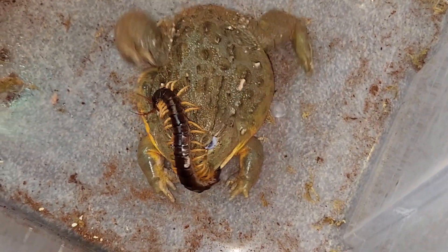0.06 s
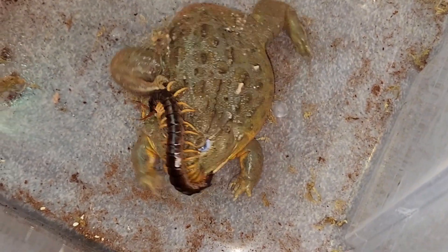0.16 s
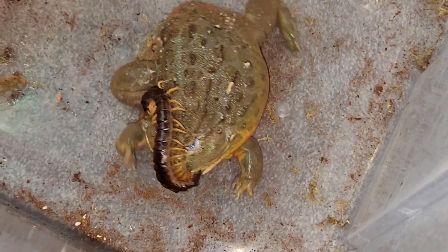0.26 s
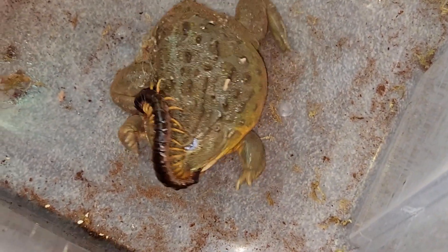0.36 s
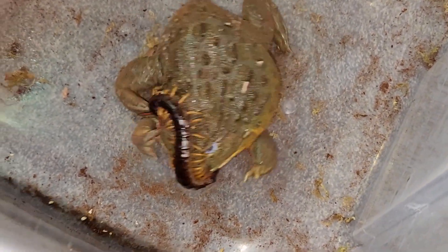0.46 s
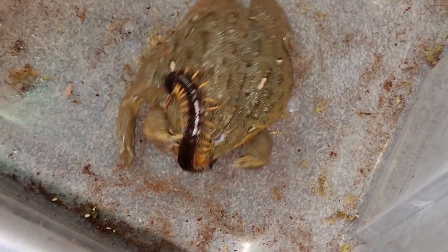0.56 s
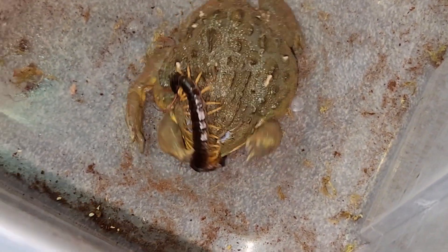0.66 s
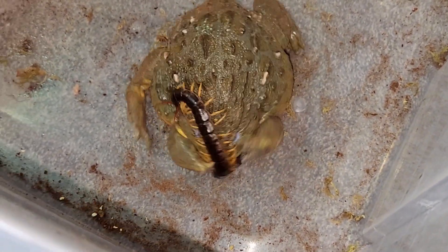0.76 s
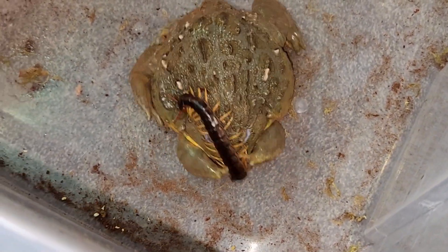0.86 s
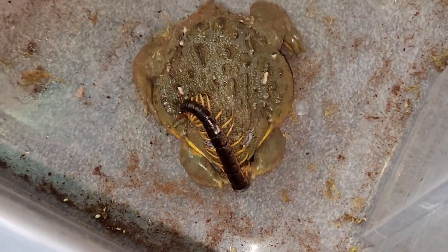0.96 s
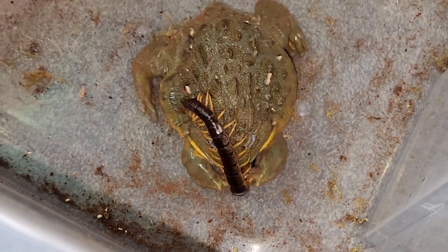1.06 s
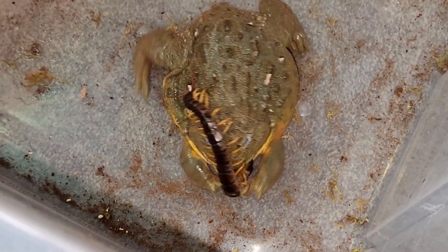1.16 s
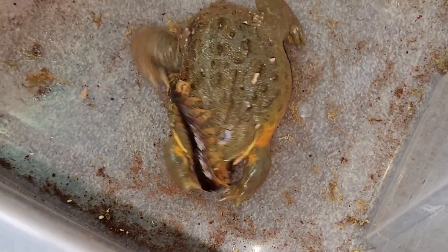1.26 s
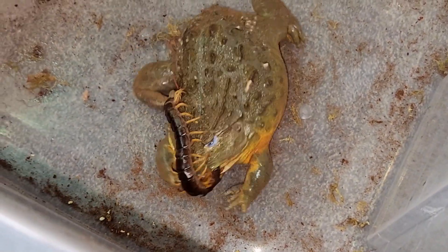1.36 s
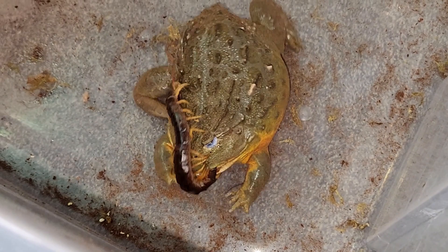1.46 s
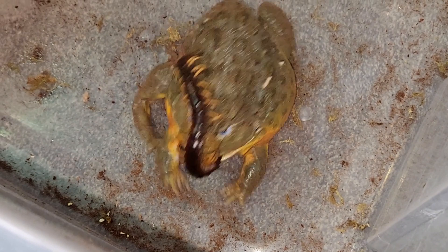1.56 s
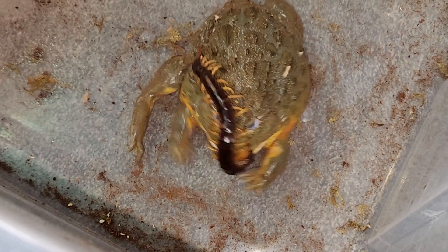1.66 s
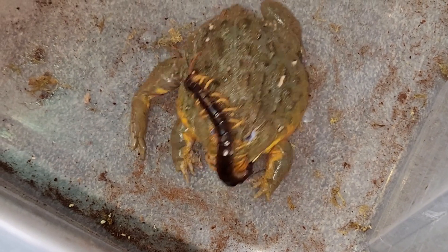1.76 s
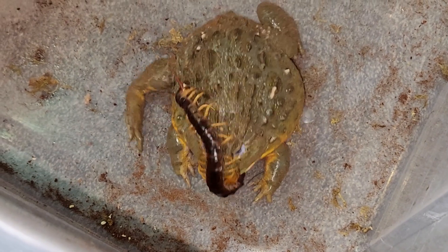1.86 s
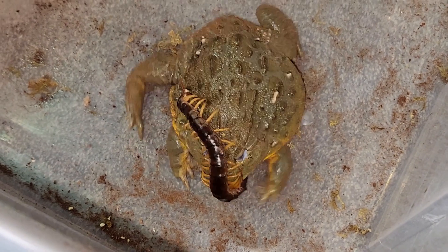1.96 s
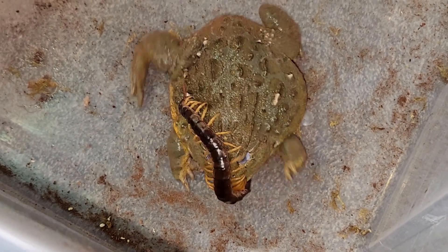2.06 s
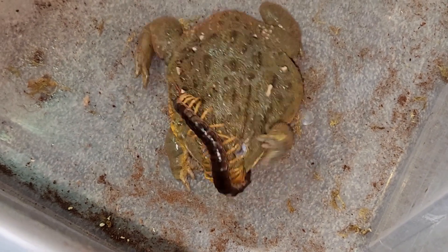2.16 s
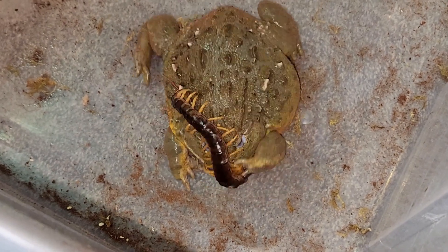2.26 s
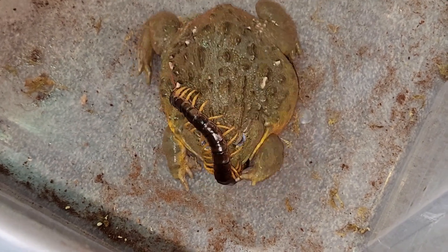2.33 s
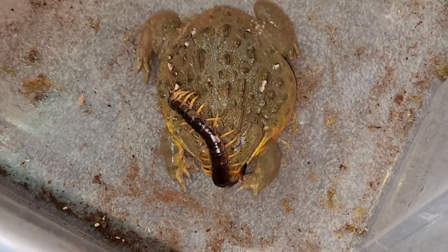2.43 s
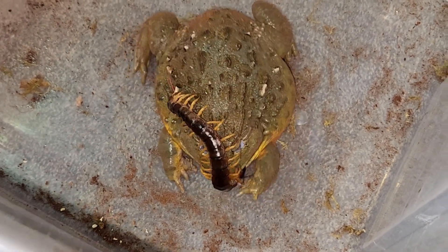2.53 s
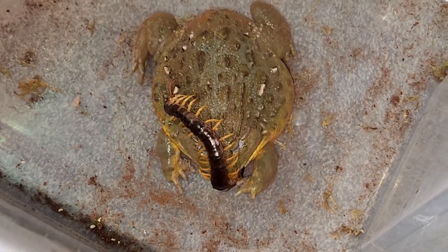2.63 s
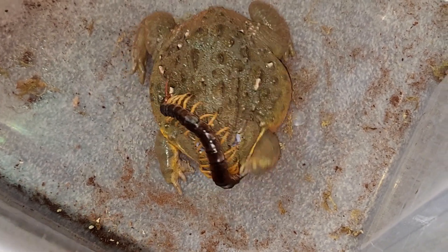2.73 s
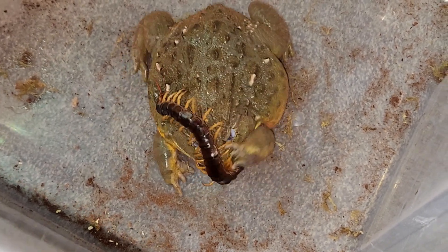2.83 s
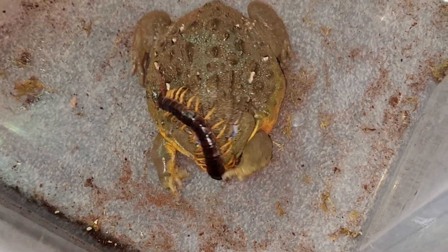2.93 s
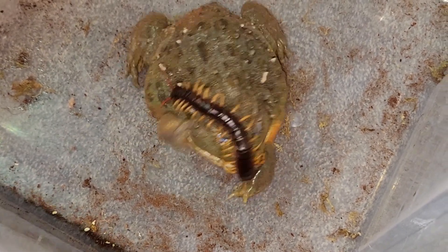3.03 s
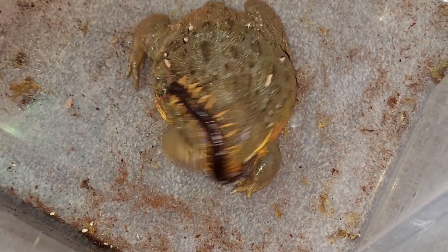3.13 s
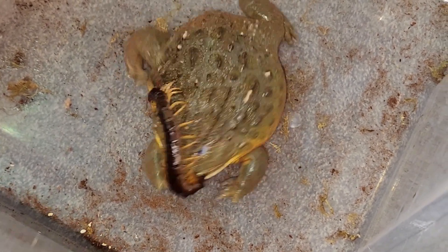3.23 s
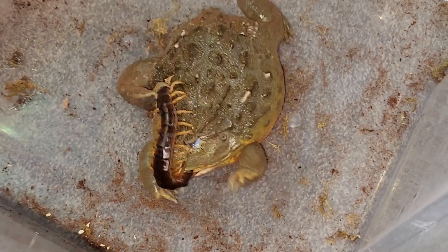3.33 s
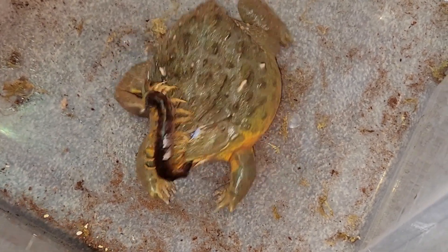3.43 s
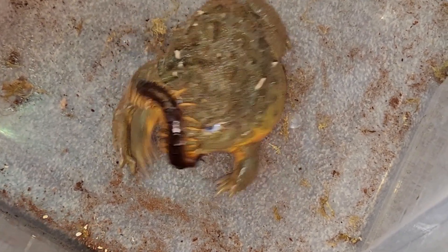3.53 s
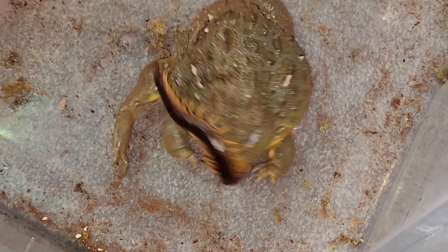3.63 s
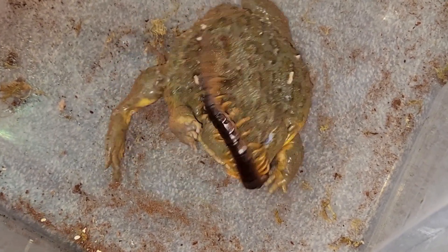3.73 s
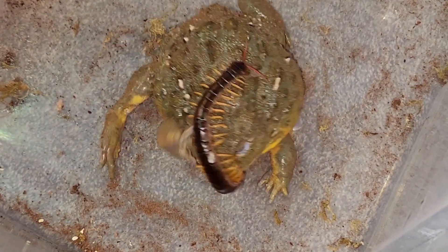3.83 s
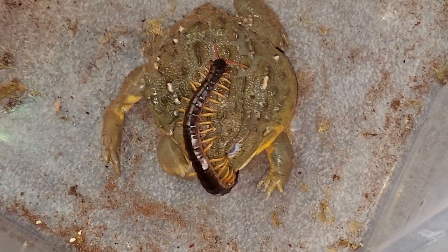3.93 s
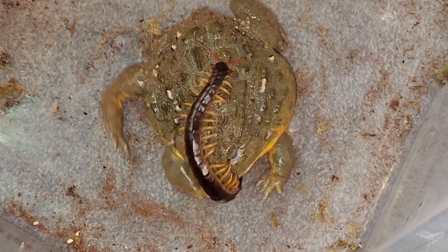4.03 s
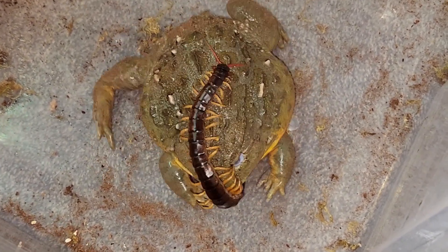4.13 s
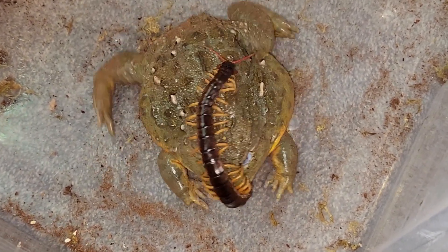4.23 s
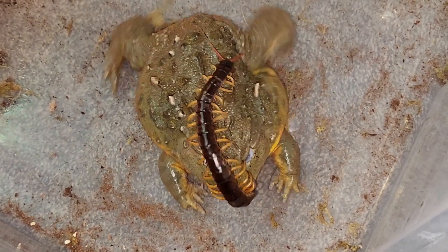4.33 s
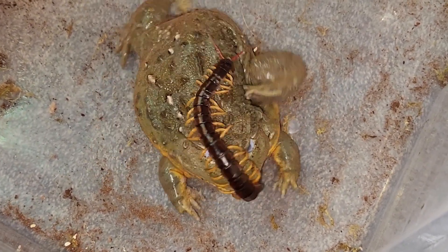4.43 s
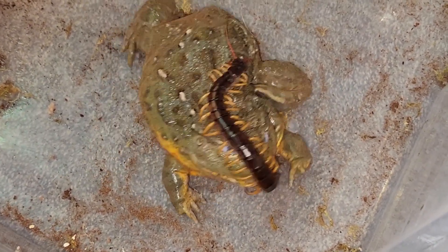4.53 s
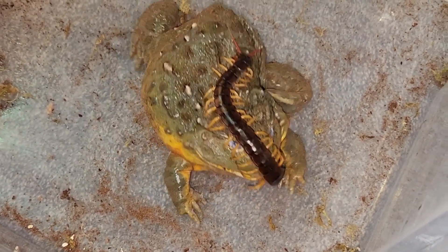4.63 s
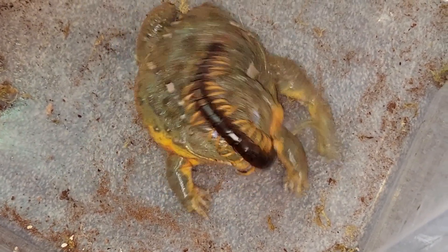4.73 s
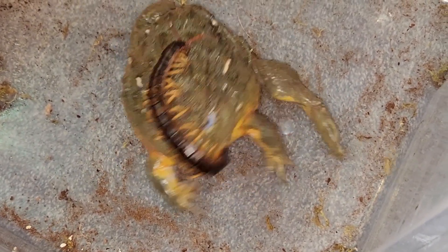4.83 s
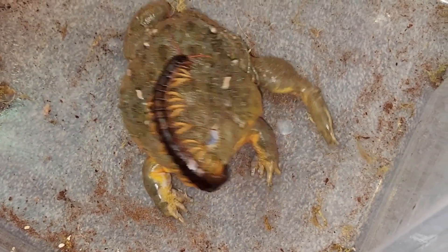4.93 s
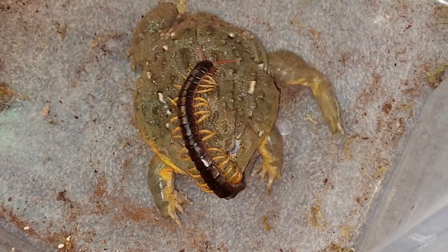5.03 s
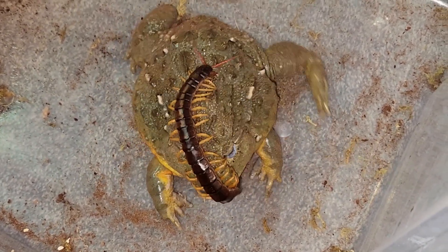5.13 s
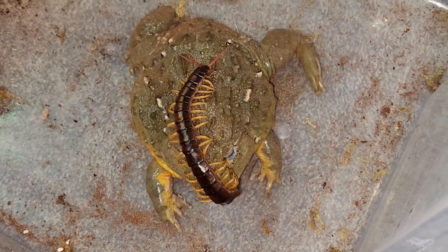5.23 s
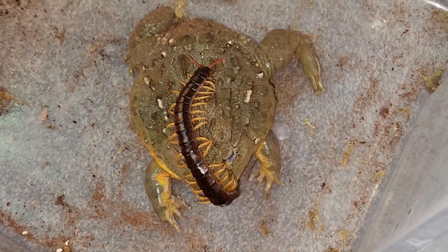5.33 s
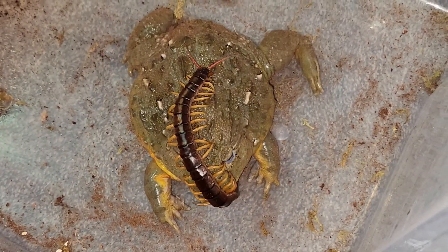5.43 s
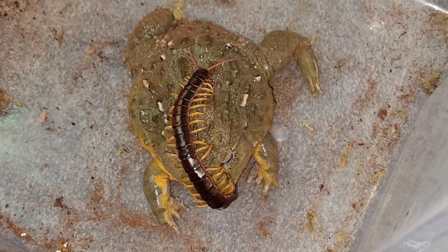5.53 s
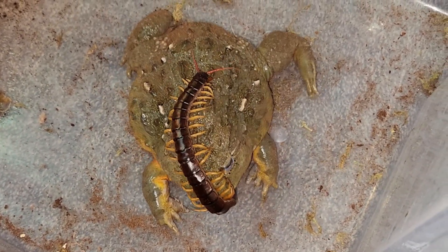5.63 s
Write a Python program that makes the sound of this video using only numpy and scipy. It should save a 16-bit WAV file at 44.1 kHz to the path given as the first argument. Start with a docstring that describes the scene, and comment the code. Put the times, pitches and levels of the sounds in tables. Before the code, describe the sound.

Close, uneven knocks and sandy skin scraping on a plastic tub floor as a frog struggles with prey, over a faint low hum.

```python
"""A plastic tub in a small room, heard up close: a big frog thrashes while it swallows a centipede.
Body blows ring the modes of the tub floor. Jaws, shell, slapping skin and grit give short noise bursts.
Skin scuffs over plastic and sand by stick-slip friction, coloured by the tub's air and walls.
A faint machine hum, a low rumble and room hiss lie underneath."""
import sys
import numpy as np
from scipy import signal
from scipy.fft import rfft, irfft, next_fast_len
from scipy.io import wavfile
from scipy.ndimage import uniform_filter1d

SR = 44100
rng = np.random.default_rng(int(sys.argv[2]) if len(sys.argv) > 2 else 0)


def output_pcm(signal):
    """Save a mono or channel-first signal as 16-bit PCM at the path in sys.argv[1].

    Samples are clipped to [-1, 1] before scaling.
    """
    pcm = np.clip(np.atleast_2d(signal).T, -1, 1) * 32767
    wavfile.write(sys.argv[1], SR, np.round(pcm).astype(np.int16))


N = 250929
TIME_S = np.arange(N) / SR

# likeness of the two channels: freq_hz, correlation
STEREO_LIKENESS = [(60, 0.8), (300, 0.88), (700, 0.6), (1400, 0.21), (3000, 0), (5000, 0.19), (8000, 0.3),
                   (14000, 0.96)]
# balance of noise textures, left over right: freq_hz, lean_db
STEREO_LEAN = [(60, -5.5), (200, 1.5), (700, 4.5), (1300, -1), (2400, 4.5), (4400, 1.5), (8100, 10),
               (12000, 6), (15000, 0)]
# room decay: freq_hz, t60_s
ROOM_DECAY = [(100, 0.75), (500, 0.19), (2000, 0.24), (6000, 0.057), (15000, 0.2)]
# room hiss spectrum: freq_hz, density_db
HISS_SPECTRUM = [(25, -3.5), (100, 1.5), (170, -10.5), (300, -18), (430, -15), (560, -24.5), (860, -16),
                 (1200, -21), (3000, -28), (6000, -33.5), (7600, -31), (10000, -51), (12500, -27),
                 (16000, -43)]
# rumble spectrum: freq_hz, density_db
RUMBLE_SPECTRUM = [(10, -20), (28, -5), (52, 0.5), (85, -5.0), (130, -19), (300, -34.5), (900, -88.5)]
# rumble surges: start_s, end_s, level_db
RUMBLE_SURGES = [(-.05, 0.752, -56), (0.273, 0.362, -44), (1.812, 2.018, -43.5), (2.038, 2.29, -46),
                 (2.35, 2.477, -50), (3.298, 3.9, -56), (4.699, 5.453, -52)]
# machine hum swells: start_s, end_s, lower_line_db, upper_line_db
HUM_SWELLS = [(0.401, 1.45, -53.5, -69), (3.5, 4.083, -54.5, -65), (4.094, 5.9, -49.5, -51.5),
              (5.15, 5.9, -48, -59)]
# air resonances in the tub: freq_hz, width_hz, gain_db
CAVITY_MODES = [(576, 30, 2.5), (747, 41, 9), (880, 110, 8.5), (1387, 190, 4), (2024, 70, 2),
                (2290, 80, 2.5), (3064, 110, 6), (3496, 88, 6)]
# sand dragged over plastic: freq_hz, density_db
GRIT_SPECTRUM = [(4000, -10), (6200, -9), (7800, 4), (9600, -6.5), (12500, 3.5), (15500, -2)]
# skin scuffing plastic: freq_hz, density_db
SCUFF_SPECTRUM = [(90, -10.5), (160, 2), (235, 6.5), (315, -2.5), (450, -0.5), (620, -6), (900, -8),
                  (1700, -5.5), (3000, -9), (4200, -12), (6000, -13), (9000, -24.5)]
# bouts of fidgeting: start_s, end_s, scuff_db
BOUTS = [(-.1, 1.094, -57), (1.04, 2.533, -64), (2.89, 4.234, -62.5), (4.199, 5.284, -59)]
# skin slides: start_s, end_s, rise_share, scuff_db, grit_db, rasp_db, rasp_hz
SLIDES = [(-.06, .12, 0.52, -49.5, -56, -50, 1000), (0.069, .245, 0.27, -51, -57.5, -48, 1770),
          (.22, 0.427, 0.75, -51, -54.5, -51, 1830), (0.462, 0.699, 0.087, -54, -58.5, -53.5, 1530),
          (0.659, 0.841, .3, -63, -61, -71.5, 1490), (0.809, .985, .5, -49, -50, -51, 990),
          (1.041, 1.197, 0.48, -58, -63, -59, 1360), (1.199, 1.438, 0.27, -50, -57.5, -60, 980),
          (1.477, 1.632, 0.49, -45.5, -49.5, -55, 850), (1.585, 1.735, 0.4, -48, -54, -50, 1440),
          (1.79, 2.152, 0.43, -56.5, -59, -59.5, 1200), (2.016, 2.18, 0.36, -68, -65, -56.5, 800),
          (2.343, 2.462, 0.41, -66, -66.5, -78, 710), (2.93, 3.111, 0.55, -62.5, -63, -78, 1000),
          (3.166, 3.362, 0.52, -48.5, -55, -61, 1600), (3.448, 3.6, 0.56, -45, -53.5, -58, 1800),
          (3.567, 3.818, 0.26, -54, -56.5, -61, 2190), (3.979, 4.18, 0.5, -58.5, -60, -61, 1040),
          (4.231, 4.439, 0.7, -50, -54, -45.5, 780), (4.367, 4.547, 0.57, -50, -57, -55, 4740),
          (4.65, 4.952, 0.39, -48, -54.5, -52.5, 1600), (4.922, 5.31, 0.78, -55.5, -64.5, -54, 1440),
          (5.126, 5.31, 0.46, -54.5, -63, -50, 263)]
# single grains under the toes: start_s, level_10ms_db
GRAIN_TICKS = [(0.705, -50), (0.719, -52), (0.857, -50.5), (2.2913, -58.5), (2.9064, -64.5), (3.2, -58),
               (3.251, -60), (3.494, -49.5), (3.938, -61.5), (3.9956, -57)]
# grit crushed by the hardest lunges: start_s, level_10ms_db
GRIT_CRUNCHES = [(0.5235, -44.5), (0.544, -40), (3.015, -52), (3.51, -41), (3.537, -48), (4.764, -39.5),
                 (4.797, -43.5)]
# burst shapes of those two: low_hz, high_hz, decay_s, lean_db
TICK_SHAPE, CRUNCH_SHAPE = (4500, 14700, 0.0017, 7.1), (2600, 15000, 0.011, 3.9)
# jaws and shell snapping, plus a second skin slap of the blow at 3.515 s: start_s, level_10ms_db, low_hz,
# high_hz, decay_s, lean_db
JAW_SNAPS = [(0.3557, -35, 577, 4640, 0.0037, 2.5), (0.4606, -29.5, 3860, 10300, 0.0032, 4),
             (0.462, -41, 770, 3030, 0.0052, 7.5), (0.5433, -23.5, 450, 3030, 0.0021, 3.5),
             (0.5457, -27.5, 700, 3370, 0.0017, -2.5), (1.1824, -55.5, 1770, 6870, 0.002, 6),
             (1.3609, -46.5, 1700, 3620, 0.004, 1), (1.48, -35, 2140, 3440, 0.0025, 5.5),
             (1.699, -40, 860, 1930, 0.0011, 0.5), (3.134, -54.5, 1020, 1580, 0.0049, 2),
             (3.391, -59, 2040, 2900, 0.002, 9), (3.52, -40, 590, 2040, 0.0086, -7),
             (4.4574, -43, 990, 2200, 0.0034, 3), (4.736, -45.5, 990, 6350, 0.0023, 2)]
# tub floor modes: freq_hz, level_db, t60_s, right_lag_cycles
FLOOR_MODES = [(81.8, -17.5, 0.45, 0.021), (107.8, -18, 0.34, 0.0099), (132.5, -3.5, 0.18, .02),
               (156, 1.5, 0.062, 0.064), (199.8, 4.5, 0.099, 0.038), (216, -9.5, 0.11, 0.17),
               (265.5, -21, 0.14, 0.065), (365.6, -13, 0.056, 0.13), (397.3, -23, .09, 0.058)]
# body blows on the floor: start_s, peak_db, hardness_db_per_octave, rise_s, slap_db, slap_hz
BLOWS = [(0.357, -39, 7, 0.006, -49, 850), (0.459, -36.5, 3, 0.0042, -60, 900),
         (0.5246, -29.5, -2, 0.0047, -49, 1500), (0.5375, -21, -1.5, 0.0017, -50, 904),
         (1.2695, -17.5, 8.5, 0.0019, -44.5, 746), (1.4673, -33.5, -7, 0.0007, -59, 900),
         (1.5381, -16.5, -5.5, 0.0037, -39, 830), (3.028, -13, 11, 0.0021, -41, 1110),
         (3.3159, -27.5, -8, 0.0032, -45.5, 800), (3.4404, -23.5, 6.5, 0.0048, -65, 810),
         (3.467, -23.5, 12, 0.0022, -47, 815), (3.515, -11.5, -8, 0.0018, -37, 1010),
         (4.082, -39, -12, 0.0019, -61, 900), (4.606, -48, 15, 0.0012, -45.5, 715),
         (4.746, -25.5, -1, 0.0022, -66, 900), (4.776, -20, 5, 0.00033, -41.5, 980)]


def gain_of(db):
    """Decibels to amplitude."""
    return 10 ** (np.asarray(db) / 20)


def unit_rms(x):
    """Scales to rms 1."""
    return x / np.sqrt(np.mean(x ** 2) + 1e-20)


def curve_at(points, hz):
    """Interpolates a table over log frequency."""
    points_hz, values = np.transpose(points)
    return np.interp(np.log(hz + 1), np.log(points_hz + 1), values)


def add(mix, start_s, sound):
    """Mixes in a stereo sound."""
    part = mix[:, round(start_s * SR):][:, :sound.shape[1]]
    part += sound[:, :part.shape[1]]


def panned(x, lean_db):
    """Positive lean is to the left."""
    return x * gain_of(np.array([[.5], [-.5]]) * lean_db)


def paired_spectra(x):
    """Two independent noises to stereo spectra, alike in the bass and at the top."""
    left, other = rfft(x)
    likeness = np.clip(curve_at(STEREO_LIKENESS, np.fft.rfftfreq(x.shape[1], 1 / SR)), -1, 1)
    return np.array([left, likeness * left + np.sqrt(1 - likeness ** 2) * other])


def coloured(x, spectrum):
    """Gives a texture its spectrum and stereo image, at rms 1."""
    hz = np.fft.rfftfreq(x.shape[1], 1 / SR)
    stereo = panned(paired_spectra(x), curve_at(STEREO_LEAN, hz))
    return unit_rms(irfft(stereo * gain_of(curve_at(spectrum, hz)), x.shape[1]))


def swell(t, start_s, end_s, rise_s, fall_s):
    """Sine rise, hold, sine fall."""
    return np.sin(np.pi / 2 * np.clip(np.minimum((t - start_s) / rise_s, (end_s - t) / fall_s), 0, 1))


def swelling(rest_db, swells, edge_s):
    """Gain of a steady level plus swells; powers add."""
    power = sum((gain_of(db) * swell(TIME_S, start_s, end_s, edge_s, edge_s)) ** 2
                for start_s, end_s, db in swells)
    return np.sqrt(gain_of(rest_db) ** 2 + power)


def machine_hum(lines_hz=(69.1, 109.2), rest_db=(-69.5, -70.5), waver_hz=.8):
    """Two sine lines that waver and swell."""
    hum = 0
    for k, hz in enumerate(lines_hz):
        swells = [(start_s, end_s, lines_db[k]) for start_s, end_s, *lines_db in HUM_SWELLS]
        level = swelling(rest_db[k], swells, edge_s=.2)
        drift_hz = waver_hz * unit_rms(uniform_filter1d(rng.standard_normal(N), size=12000))
        hum = hum + level * np.sqrt(2) * np.sin(2 * np.pi * np.cumsum(hz + drift_hz) / SR)
    return panned(hum, lean_db=1.5)


def room_noise(rumble_db=-61, hiss_db=-61.5):
    """Surging low rumble and steady hiss."""
    rumble = coloured(rng.standard_normal((2, N)), RUMBLE_SPECTRUM)
    hiss = coloured(rng.standard_normal((2, N)), HISS_SPECTRUM)
    return swelling(rumble_db, RUMBLE_SURGES, edge_s=0.029) * rumble + gain_of(hiss_db) * hiss


def room_reverb(x, build_s=0.0066):
    """Short diffuse tail; the bass lasts longest."""
    hz, t, spectra = signal.stft(rng.standard_normal((2, SR // 2)), SR, nperseg=256)
    decay = gain_of(-60 * t / curve_at(ROOM_DECAY, hz)[:, None])
    tail = signal.istft(spectra * decay, SR, nperseg=256)[1]
    onset = np.minimum(np.arange(tail.shape[1]) / SR / build_s, 1)
    tail = irfft(paired_spectra(tail * onset))
    return signal.fftconvolve(x, tail / np.linalg.norm(tail[0]), axes=1)[:, :N]


def tub_cavity(x):
    """The air in the tub rings briefly at its resonances."""
    return x + sum((gain_of(db) - 1) * signal.lfilter(*signal.iirpeak(hz, hz / width_hz, SR), x)
                   for hz, width_hz, db in CAVITY_MODES)


def tub_walls(x, echo_gain=0.36, reach_s=.009, count=7):
    """Wall echoes comb the sound; random delays stand for a spot on the floor."""
    delays_s = rng.uniform(0.1014, 1, (count, 1)) * reach_s
    hz = np.fft.rfftfreq(x.shape[1], 1 / SR)
    comb = 1 + echo_gain * np.exp(-2j * np.pi * delays_s * hz).sum(0)
    return irfft(rfft(x) * comb, x.shape[1])


def stick_slip(size, per_s, spread_db, hiss_gain):
    """Friction: tiny uneven clicks over smooth hiss, echoed by the walls."""
    strengths = gain_of(spread_db * np.minimum(rng.exponential(1, size), 4))
    slipping = rng.random(size) < per_s / SR
    clicks = unit_rms(strengths * slipping * rng.standard_normal((2, size)))
    return tub_walls(clicks + hiss_gain * rng.standard_normal((2, size)))


def judder(depth_db, span_samples=500):
    """Gain flutter from uneven skin pressure."""
    pressure = uniform_filter1d(uniform_filter1d(rng.standard_normal(N), span_samples), span_samples)
    return gain_of(depth_db * unit_rms(pressure))


def moving_contact(x, depth_db=2.0, span_frames=9, span_bins=3):
    """Resonances come and go as the contact patch moves."""
    spectra = signal.stft(x, SR, nperseg=512, noverlap=384)[2]
    patches = uniform_filter1d(rng.standard_normal(spectra.shape[1:]), span_bins, 0)
    patches = unit_rms(uniform_filter1d(patches, span_frames, 1))
    ripple = unit_rms(gain_of(depth_db * patches))
    return signal.istft(spectra * ripple, SR, nperseg=512, noverlap=384)[1][:, :N]


def grit(size, coarse_db=-10):
    """Fine sand hisses under the skin; sparser coarse grains tick."""
    fine = coloured(stick_slip(size, per_s=5000, spread_db=8, hiss_gain=1.6), GRIT_SPECTRUM)
    coarse = coloured(stick_slip(size, per_s=110, spread_db=5.0, hiss_gain=.05), GRIT_SPECTRUM)
    return fine + gain_of(coarse_db) * coarse


def fidget(grit_db=-3, edge_s=0.1, tire_db_per_s=5):
    """Faint scuffing of a restless frog; each bout weakens as it goes."""
    effort = 0
    for start_s, end_s, db in BOUTS:
        level = gain_of(db - tire_db_per_s * (TIME_S - start_s))
        effort = effort + level * swell(TIME_S, start_s, end_s, edge_s, edge_s)
    friction = stick_slip(N, per_s=980, spread_db=5.0, hiss_gain=2.5)
    scuff = coloured(tub_cavity(friction), SCUFF_SPECTRUM)
    return effort * (scuff + gain_of(grit_db) * grit(N)) * judder(depth_db=0.8)


def skin_slides(sag_db_per_s=29, stop_s=0.064, rasp_step_octaves=0.66):
    """Skin scuffs, drags grit and rasps as it sticks. Each slide swells; friction slows and stops it."""
    out = np.zeros((2, N))
    for start_s, end_s, rise_share, scuff_db, grit_db, rasp_db, rasp_hz in SLIDES:
        size = next_fast_len(int((end_s - start_s) * SR))
        t = max(start_s, 0) + np.arange(size) / SR
        rise_s = rise_share * (end_s - start_s)
        sag = gain_of(-sag_db_per_s * np.maximum(t - start_s - rise_s, 0))
        speed = swell(t, start_s, end_s, rise_s, stop_s) * sag
        sliding = stick_slip(size, per_s=2300, spread_db=-1.0, hiss_gain=0.7)
        scuff = gain_of(scuff_db) * coloured(tub_cavity(sliding), SCUFF_SPECTRUM)
        sticking = stick_slip(size, per_s=1400, spread_db=3.0, hiss_gain=0.95)
        hump = [(rasp_hz * 2 ** (k * rasp_step_octaves), -5 * k ** 2) for k in np.arange(-3, 4)]
        rasp = gain_of(rasp_db) * coloured(tub_cavity(sticking), hump)
        add(out, t[0], speed * (scuff + gain_of(grit_db) * grit(size) + rasp))
    return out * judder(depth_db=1.5)


def crackle(envelope, span_bins=40):
    """Noise burst under an envelope, spectrum flattened."""
    noise = irfft(paired_spectra(rng.standard_normal((2, len(envelope)))))
    spectra = rfft(noise * envelope)
    return irfft(spectra / np.sqrt(uniform_filter1d(abs(spectra) ** 2, span_bins, 1) + 1e-12))


def grain_contacts():
    """Grains ticking and crushed under the frog, as rows like JAW_SNAPS."""
    ticks = [(start_s, db, *TICK_SHAPE) for start_s, db in GRAIN_TICKS]
    return ticks + [(start_s, db, *CRUNCH_SHAPE) for start_s, db in GRIT_CRUNCHES]


def skin_slaps(lead_s=.002, width_octaves=1.43, decay_s=0.0036):
    """Skin lands just before the weight of each blow; rows like JAW_SNAPS."""
    edge = 2 ** (width_octaves / 2)
    return [(start_s - lead_s, db, hz / edge, hz * edge, decay_s, 0) for start_s, *_, db, hz in BLOWS]


def contact_bursts(contacts, scatter_db=-23, scatter_s=0.021, rise_s=0.00072, cavity_mix=0.79):
    """A band of crackle per contact, trailed by scatter between the tub walls."""
    out, pad_s = np.zeros((2, N)), .005
    t = np.maximum(np.arange(4096) / SR - pad_s, 0)
    for start_s, db, low_hz, high_hz, decay_s, lean_db in contacts:
        fall = np.exp(-t / decay_s) + gain_of(scatter_db) * np.exp(-t / scatter_s)
        envelope = fall * (1 - np.exp(-t / rise_s))
        band = signal.butter(2, [low_hz, high_hz], "band", fs=SR, output="sos")
        burst = signal.sosfilt(band, crackle(envelope))
        burst = (1 - cavity_mix) * burst + cavity_mix * tub_cavity(burst)
        burst *= np.sqrt(.01 * SR) / np.linalg.norm(burst, axis=1, keepdims=True)  # 10 ms at rms 1
        add(out, start_s - pad_s, panned(gain_of(db) * burst, lean_db))
    return out


def body_thumps(lean_db=2, detune_share=0.013, cut_hz=70):
    """Blows ring the floor; soft ones favour low modes. The frog's weight detunes each mode slightly."""
    out, t = np.zeros((2, N)), np.arange(SR // 2) / SR
    low_cut = signal.butter(2, cut_hz, "high", fs=SR, output="sos")  # a small floor radiates no deep bass
    for start_s, peak_db, hardness_db_per_octave, rise_s, *_ in BLOWS:
        ring = 0
        for hz, db, t60_s, lag_cycles in FLOOR_MODES:
            detuned_hz = hz * (1 + detune_share * rng.standard_normal())
            cycles = detuned_hz * t + np.array([[.5], [-.5]]) * lag_cycles
            mode_db = db + hardness_db_per_octave * np.log2(hz / 200) - 60 * t / t60_s
            ring = ring + gain_of(mode_db) * np.sin(2 * np.pi * cycles)
        ring = signal.sosfilt(low_cut, ring * (1 - np.exp(-t / rise_s)))
        add(out, start_s, panned(gain_of(peak_db) * ring / abs(ring).max(), lean_db))
    return out


def scene():
    """Frog in its tub over hum and room noise; only the impacts feed the reverb."""
    thumps = body_thumps()
    bursts = contact_bursts(JAW_SNAPS + skin_slaps() + grain_contacts())
    reverb = room_reverb(gain_of(-27.0) * bursts + gain_of(-22.5) * thumps)
    scuffing = moving_contact(skin_slides() + fidget())
    return thumps + bursts + reverb + scuffing + machine_hum() + room_noise()


def record(dry):
    """Steep low-pass at 16 kHz."""
    low_pass = signal.firwin(511, 16000, window=("kaiser", 9), fs=SR)
    return signal.oaconvolve(dry, low_pass[None], "same")


dry = scene()
out = record(dry)
output_pcm(out)
```